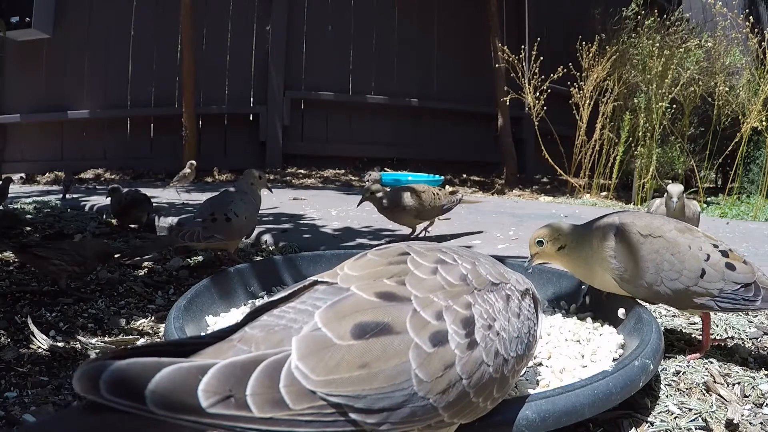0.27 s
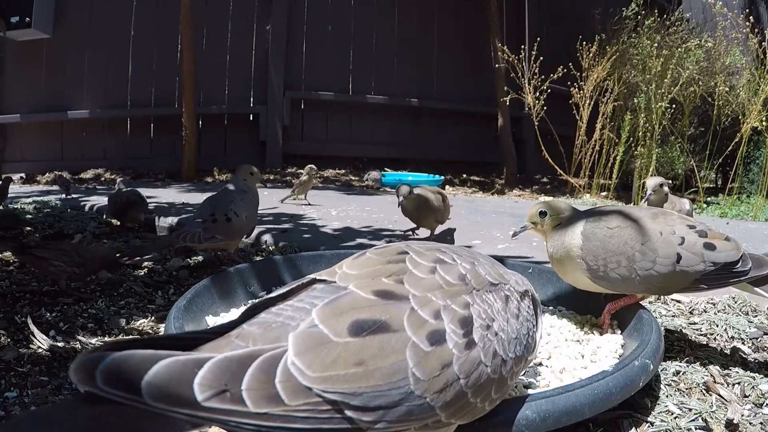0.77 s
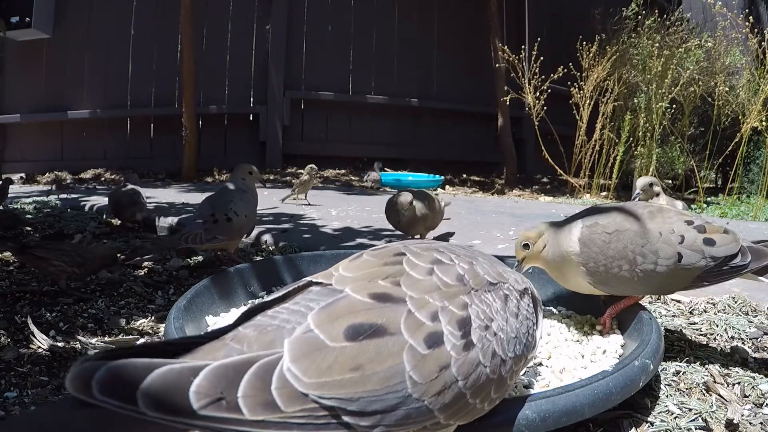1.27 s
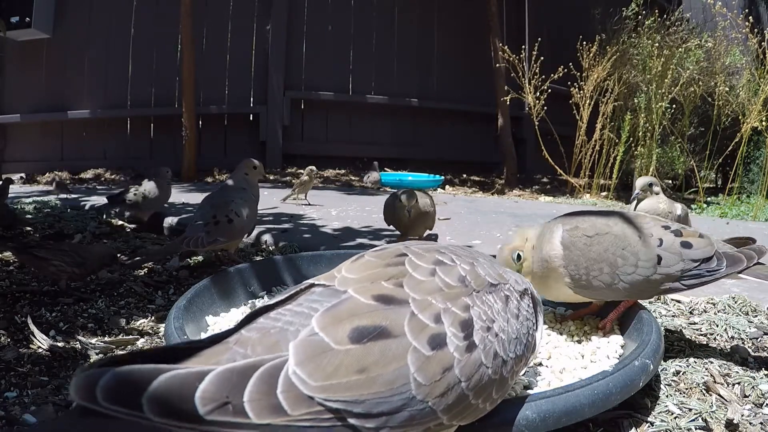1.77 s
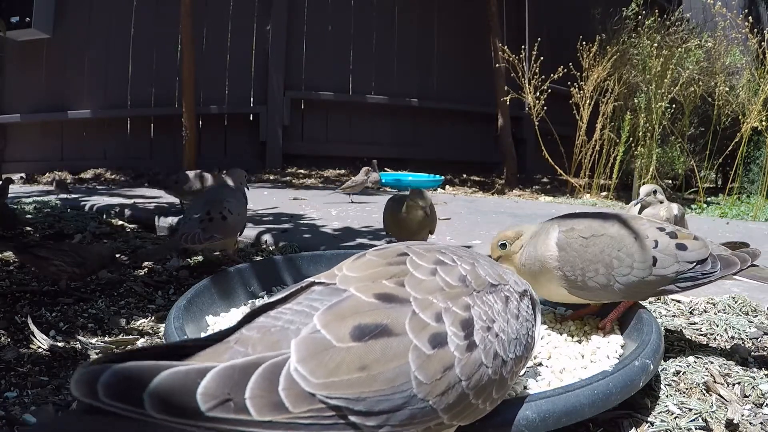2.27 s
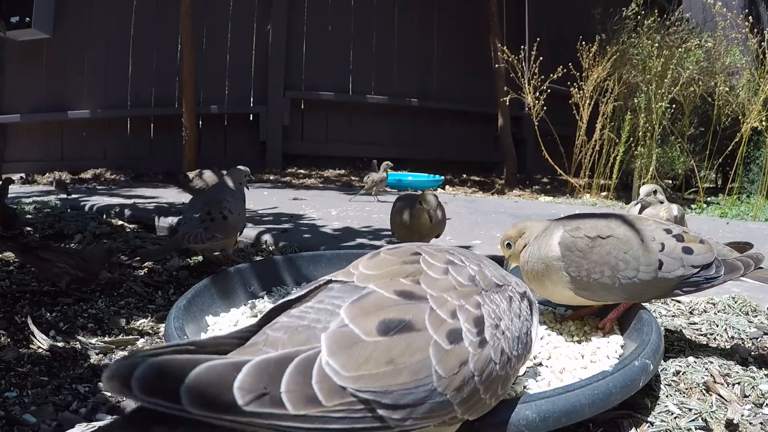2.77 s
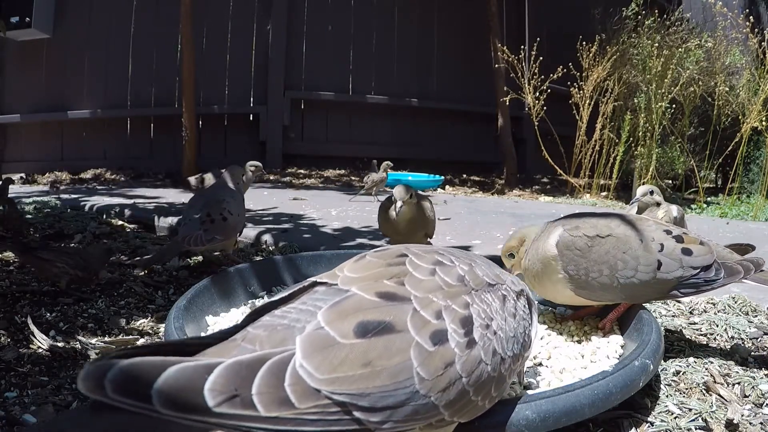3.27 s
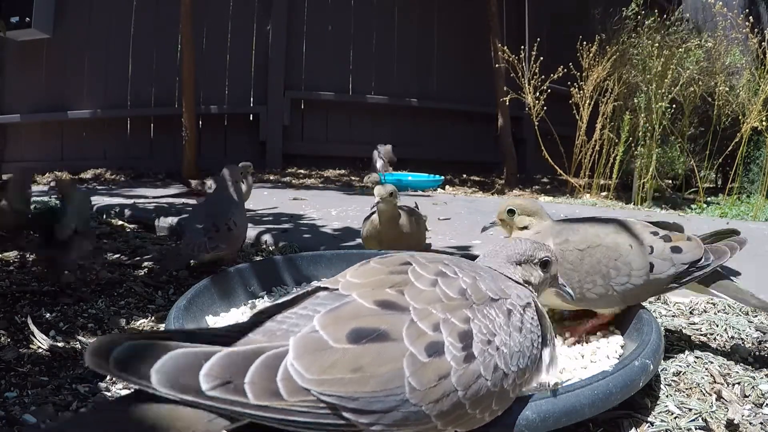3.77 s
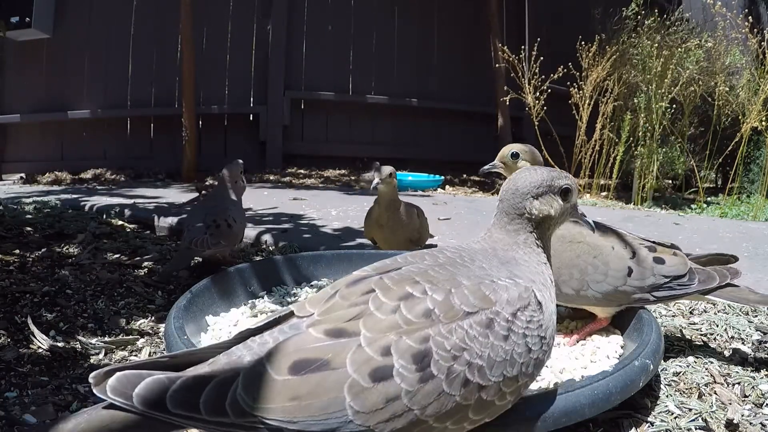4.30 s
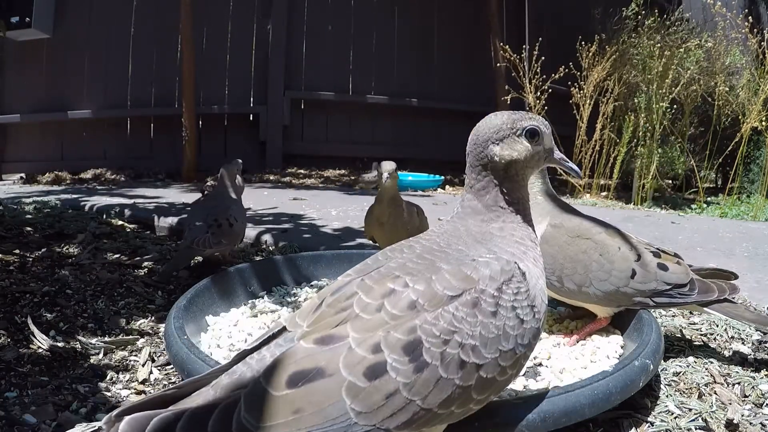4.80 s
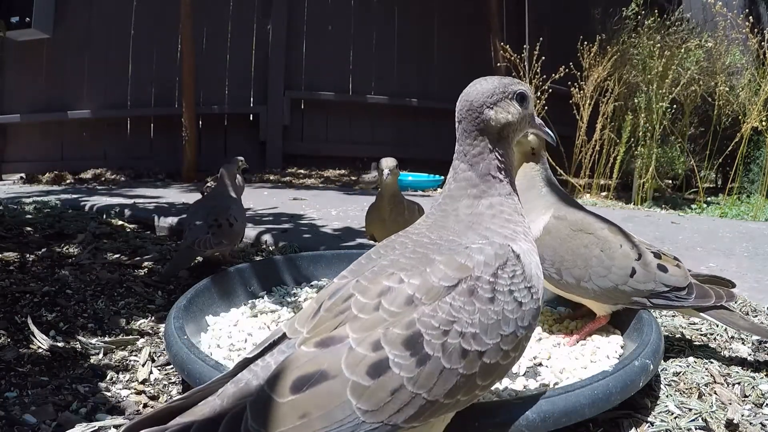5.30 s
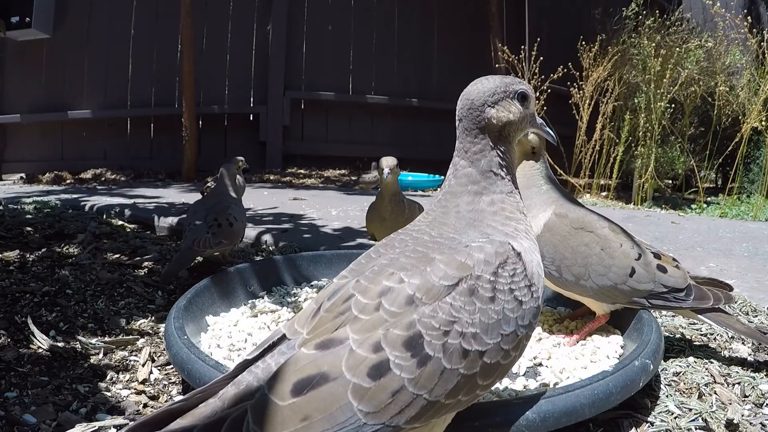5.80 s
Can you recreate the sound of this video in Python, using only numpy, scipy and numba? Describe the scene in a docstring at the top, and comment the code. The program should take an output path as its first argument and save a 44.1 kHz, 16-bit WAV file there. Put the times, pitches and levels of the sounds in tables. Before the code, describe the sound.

In a backyard, doves peck seed from a plastic dish right by the microphone, making sharp, scattered clicks and crackles. Tail feathers tap and scrape the microphone's housing with a hollow sound. Then one dove takes off in a loud burst of cracks, scattered seed and rustling wings, and the pecking thins out. A distant small bird repeats a high buzz over a low town rumble.

```python
"""A distant bird's buzz, then sharp clicks up close: doves peck seed from a plastic dish in a backyard.
Beaks and seeds crack and knock the dish; tail feathers tap and scrape a small camera's housing and ring
its modes. One dove takes off in a rustle of feathers and seed. The small bird's buzz is a fast pitch
warble. Town rumble, a thin whine and wind at the two microphone ports lie underneath, and the gain
control ducks after the loudest scrape."""
import sys
import numpy as np
from scipy import signal
from scipy.fft import rfft, irfft
from scipy.io import wavfile
from scipy.ndimage import uniform_filter1d
from numba import njit

SR = 44100
rng = np.random.default_rng(int(sys.argv[2]) if len(sys.argv) > 2 else 0)


def put_to_file(sound):
    """Save the sound as 16-bit audio at rate SR, in the file named by the first command-line argument."""
    columns = np.atleast_2d(sound).T  # one column per channel
    safe = np.clip(columns, -1, 1)
    whole_steps = np.round(safe * 32767)
    wavfile.write(sys.argv[1], SR, whole_steps.astype(np.int16))


N = 266760

# Port resonances: f/Hz, base width/Hz, gain/dB
PORT_MODES = [(4800, 1500, -10), (7000, 1400, 0), (9300, 2200, -7), (12500, 2500, -14)]
# Dish resonances: f/Hz, width/Hz, gain/dB
DISH_MODES = [(1640, 670, 29), (2250, 520, -16), (3190, 450, 28)]
# Beak and seed hits: t/s, level/dB, dish knock/dB re crack, seed scatter/dB re crack
PECKS = [(0.193, -19.5, -13, -17), (0.2036, -22, -8, -13), (0.215, -24.5, -14, -16), (0.22, -27, -12, -14),
         (0.2256, -21, -8.5, -10), (0.2315, -29, -14, -12), (0.238, -23, -8, -11),
         (0.2506, -14, -14.5, -15), (0.3018, -29, -14, -15), (0.4427, -25.5, -17, -20),
         (0.5365, -36, -10, -15), (0.5678, -23, -19, -15), (0.575, -27, -21, -18), (1.1368, -33, -15, -18),
         (1.191, -30, -12, -15), (1.1945, -25, -10, -15), (1.342, -25.5, -9, -26), (1.348, -26, -9, -20),
         (1.4438, -30, -16, -14), (1.9438, -32, -13, -15), (2.0106, -33.5, -22, -18), (2.98, -37, -10, -15),
         (3.151, -26.5, -23, -16), (3.612, -25.5, -8, -12), (3.6387, -19.5, -9, -10),
         (3.6582, -27, -2, -12), (3.6704, -26, -3, -12), (3.6847, -21, -2, -8), (3.7001, -5, -8.5, -14),
         (3.7301, -6, -10.5, -10), (3.771, -12.5, -9, -14), (3.8082, -20.5, -11, -5), (3.897, -26, -9, -10),
         (3.9863, -17, -10, -10), (4.0032, -28, -9, -11), (4.0174, -23, -13, -11), (4.037, -22.5, -18, -9),
         (4.1022, -31, 1, -15), (4.2017, -21, -8.5, -15), (4.2306, -22.5, -7, -7), (4.346, -33, -6, -15),
         (4.3675, -30.5, -6, -8), (4.7142, -29.5, -2.5, -10), (4.7236, -24.5, -18, -14),
         (4.728, -26.5, -20, -10), (5.025, -37, -13, -11)]

def pecks(rise_s=.0003, decay_s=.0006, scatter_s=.0059, blow_s=.0014, pan_spread_db=2):
    """Each hit cracks into the port resonances, knocks the dish and trails a faint scatter of seed."""
    out, t = np.zeros((2, N)), np.arange(2200) / SR
    for s, db, knock_db, scatter_db in PECKS + stray_seeds():
        pan_db = pan_spread_db * rng.standard_normal()
        decay = np.exp(-t / decay_s) + undb(scatter_db) * np.exp(-t / scatter_s)
        crack = rng.standard_normal((2, len(t))) * (1 - np.exp(-t / rise_s)) * decay
        shades_db = 2 * rng.standard_normal(len(PORT_MODES))
        bright = sum(undb(mode_db + shade_db) * ring(ring(crack, hz, 8.8 * width), hz, 1.22 * width)
                     for (hz, width, mode_db), shade_db in zip(PORT_MODES, shades_db))
        blow = rng.standard_normal((2, len(t))) * np.exp(-t / blow_s)
        blow = blow + .47 * blow[::-1]  # crossfeed
        knock = sum(undb(mode_db) * ring(blow, hz, width) for hz, width, mode_db in DISH_MODES)
        click = .5 * (bright / peak(bright[0]) + undb(knock_db) * knock / peak(knock[0]))
        add(out, s, click * undb(db + np.array([[pan_db], [-pan_db]]) / 2))
    return out


def stray_seeds(gap_s=.025, boost_db=1.5, spread_db=3, knock_db=-2.5, scatter_db=-15):
    """Loose seeds tick at chance times, following the rustle level; rows as in PECKS."""
    times = np.arange(0, N / SR - .1, gap_s)
    times += gap_s * rng.random(len(times))
    rustle_db = 20 * np.log10(seed_motion()[(times * SR).astype(int)])
    levels_db = rustle_db + boost_db + spread_db * rng.standard_normal(len(times))
    return [(s, db, knock_db, scatter_db) for s, db in zip(times, levels_db)]


# Housing resonances: f/Hz, base width/Hz, side/dB, mid/dB
HOUSING_MODES = [(177, 75, -19, -38), (559, 270, -11, -17), (862, 270, -2, -11), (1212, 154, 4, -4.5),
                 (1380, 165, -9, -4.5), (1726, 175, -12, -7.5), (2360, 165, -9, -6), (3344, 320, -36, -14)]

def feather_touch(s, db, rise_ms, fall_ms, scratch_db, tilt_db_oct, side_db=10):
    """Slipping barbs ring the housing and scratch through the air; returns start time and sound."""
    lead_s = .015
    t = np.arange(1800) / SR - lead_s
    envelope = .5 ** np.where(t < 0, (1000 * t / rise_ms) ** 2, (1000 * abs(t) / fall_ms) ** 1.5)
    slips = grains(1.04, size=(4, len(t))) * envelope
    push = slips[:2] + .39 * slips[0]
    detunes = 1 + .015 * rng.standard_normal(len(HOUSING_MODES))  # feather pressure shifts the modes
    spots_db = 1.6 * rng.standard_normal(len(HOUSING_MODES))  # each spot favours other modes
    modes = np.zeros_like(push)
    for (hz, width, mode_side_db, mode_mid_db), detune, spot_db in zip(HOUSING_MODES, detunes, spots_db):
        tilt_db = tilt_db_oct * np.log2(max(hz / 1300, 1))
        gain = undb(tilt_db) * undb([[mode_side_db + spot_db / 2], [mode_mid_db + spot_db]])
        band = detune * hz, 1.25 * width
        modes += gain * ring(ring(push, *band), *band)
    side, mid = modes
    # The touch sounds very wide, mostly opposite in phase between left and right.
    body = stereo(mid / peak(mid), undb(side_db) * side / peak(side))
    scratch = sum(undb(mode_db) * ring(ring(slips[2:], hz, 7.8 * width), hz, 7.8 * width)
                  for hz, width, mode_db in PORT_MODES)
    scratch = np.sqrt(2) * scratch / peak(scratch[0])
    return s - lead_s, undb(db) * (body + undb(scratch_db) * scratch)


# Feather taps: t/s, mid level/dB, scratch/dB re level, fall/ms, upper-mode tilt/(dB/oct)
FEATHER_TAPS = [(0.8427, -32.5, -11, 1.6, -7.5), (1.105, -27, -30, 1.25, -5),
                (1.115, -30.5, -22.5, 3.7, -3), (1.163, -28.5, -18, 2, -2), (1.284, -33.5, -10, 1.5, 1),
                (2.0398, -26.5, -32, 0.8, -4), (2.0826, -47, -20, 2.4, -6), (2.1097, -29, -15.5, 0.64, -2),
                (2.136, -32, -25, 1.8, -6), (2.2392, -28.5, -16, 1.3, -5), (2.359, -28.5, -14.5, 1.04, 0.5),
                (2.377, -35.5, -24, 2.7, 0), (2.399, -29, -21, 2.47, 0), (2.414, -27.5, -10, 3, 4),
                (2.4242, -27, -15, 2.4, 1), (2.5475, -24, -10, 3.18, -1), (2.561, -44, -3, 1.9, 0),
                (2.7886, -37, -30, 5.3, -3.5)]

def feather_taps():
    """Tail feathers strike the housing in single touches."""
    out = np.zeros((2, N))
    for s, db, scratch_db, fall_ms, tilt_db_oct in FEATHER_TAPS:
        rise_ms = .45 * fall_ms
        add(out, *feather_touch(s + rise_ms / 1000, db, rise_ms, fall_ms, scratch_db, tilt_db_oct))
    return out


# Breakpoints per scrape: t/s, mid level/dB, scratch/dB re level, upper-mode tilt/(dB/oct)
FEATHER_SCRAPES = [
    [(1.179, -30.5, -12, 0), (1.185, -25, -25, -7), (1.192, -37, -22, -5), (1.202, -40, -19, -7)],
    [(1.209, -25, -10.5, 1), (1.217, -24, -14, -5), (1.226, -44, -31, -6)],
    [(2.149, -28, -9, 1), (2.16, -31, -14, 1), (2.175, -26.5, -8, -1), (2.198, -31, -17, 2.5),
     (2.208, -44, -20, -5)],
    [(2.246, -50, -16, -3), (2.25, -40, -15, -3), (2.256, -36.5, -30, -5), (2.276, -47, -14, -3),
     (2.28, -58, -10, -3)],
    [(2.405, -35, -13, 1), (2.43, -31, -12, 2), (2.437, -26, -11, 2), (2.443, -29, -12, 3),
     (2.448, -20.5, -11.5, 6), (2.462, -19, -11.5, 7), (2.483, -23, 2.5, 0), (2.501, -38, -9, 2)],
    [(2.503, -33.5, -4, 3), (2.516, -24.5, -3, 2), (2.524, -25.5, -15, 1), (2.53, -17.5, -3.5, 4),
     (2.537, -18.5, 4.5, 4), (2.544, -37, -22, -2)],
]

def feather_scrapes(gap_s=.005, rise_ms=1.48, fall_ms=3.5, spread_db=3):
    """Feathers drag along the housing, their barbs catching in quick uneven succession."""
    out = np.zeros((2, N))
    for scrape in FEATHER_SCRAPES:
        times, *columns = np.transpose(scrape)
        delays_s = .5 * gap_s * rng.random(40)
        offsets_db = spread_db * rng.uniform(-1, 1, 40)
        for k, s in enumerate(np.arange(times[0], times[-1], gap_s)):
            s += delays_s[k]
            db, scratch_db, tilt_db_oct = (np.interp(s, times, column) for column in columns)
            add(out, *feather_touch(s, db + offsets_db[k], rise_ms, fall_ms, scratch_db, tilt_db_oct))
    return out


# Short damped tones, low thumps among them: t/s, f/Hz, mid/dB, side/dB
SHORT_TONES = [(2.484, 209, -17, -21), (2.53, 158, -10, -9), (3.655, 1750, -24, -41), (3.685, 540, -16.5, -30),
               (3.788, 1400, -29, -26), (3.843, 2220, -43, -35), (4.327, 2340, -39, -32),
               (4.553, 1750, -39, -43), (4.626, 1710, -40.5, -38)]

def short_tones(base_t60_s=.027, extra_cycles=6.6):
    """Damped tones with a soft start and slightly rough pitch; lower ones ring longer."""
    out, t = np.zeros((2, N)), np.arange(6000) / SR
    for s, hz, mid_db, side_db in SHORT_TONES:
        t60_s = base_t60_s + extra_cycles / hz
        jitter_rad = hz / 2000 * walk(350)[:len(t)]
        onset = 1 - np.exp(-(2 * hz * t) ** 2)
        tone = np.sin(2 * np.pi * hz * t + jitter_rad) * onset * 1000 ** (-t / t60_s)
        add(out, s, stereo(undb(mid_db) * tone, -undb(side_db) * tone))
    return out


# Take-off envelope: t/s, rustle/dB, wing rumble/dB
TAKE_OFF_LEVELS = [(3.602, -51, -43), (3.612, -37.5, -38.5), (3.65, -38, -35), (3.69, -33.5, -31),
                   (3.715, -36.5, -33), (3.735, -30, -36), (3.77, -34.5, -36), (3.8, -39.5, -35),
                   (3.82, -36.5, -34.5), (3.86, -39, -35), (3.96, -44, -43.5), (4.02, -44, -40),
                   (4.07, -46.5, -41), (4.2, -48.5, -45.5), (4.45, -52, -47.5), (4.7, -53.5, -49.5),
                   (4.9, -85, -73)]

def wing_beats():
    """Beating wings push a low rumble into both ports."""
    mid, side = (level(ring(ring(rng.standard_normal(N), 113, 220), 114, 284), 0) for _ in range(2))
    return undb(curve(TAKE_OFF_LEVELS, column=2)) * stereo(mid, .17 * side)


# Brief rustles of shifting seed: t/s, level/dB, t60/s
SEED_SHIFTS = [(0.128, -44, .15), (0.2, -37.5, 0.31), (.52, -44.5, .24), (1.35, -44.5, 0.26),
               (1.429, -44, 0.43), (1.56, -45.5, 0.21), (4.085, -42, 0.36), (4.232, -45.5, 0.33),
               (4.362, -44.5, 0.24), (4.714, -43.5, 0.37)]

def seed_motion(rise_s=.0027):
    """Rustle amplitude: the take-off plus brief shifts of seed."""
    gain, t = undb(curve(TAKE_OFF_LEVELS, column=1)), np.arange(SR // 2) / SR
    for s, db, t60_s in SEED_SHIFTS:
        add(gain, s, undb(db) * (1 - np.exp(-t / rise_s)) * 1000 ** (-t / t60_s))
    return gain


# Seed and feather spectrum: f/Hz, relative density/dB
RUSTLE_SPECTRUM = [(350, -6.5), (600, -13), (1200, -4.5), (1600, 1.5), (2400, -0.5), (4700, -3),
                   (7000, -1.5), (9000, -1.5), (13500, -14), (15000, -22), (16000, -50)]

def rustle():
    """Seed and feathers rub in patches of dense grains, drawn separately for each port."""
    patches = undb(1.3 * walk(120) + .6 * walk(25))
    swish = [coloured(RUSTLE_SPECTRUM, grains(2.8, size=N) * patches) for _ in range(2)]
    return seed_motion() * np.array(swish)


# Small bird's notes: t/s, length/s, level/dB, top f/Hz
BIRD_NOTES = [(0, 0.23, -45.5, 7860), (0.716, 0.22, -43, 7810), (2.083, 0.215, -40.5, 7900),
              (2.769, 0.25, -40.5, 7690), (3.162, 0.08, -50, 7700), (3.25, 0.084, -55, 7340)]

def small_bird(warble_hz=244, depth_scale_hz=1660, echo_decay_s=.0095):
    """A fast uneven warble dips from an arched top pitch; fence echoes smear it."""
    song = np.zeros(N)
    for s, length_s, db, top_hz in BIRD_NOTES:
        t = np.arange(int(length_s * SR)) / SR
        arch = np.sin(np.pi * (t / length_s) ** .5)
        cycles = np.cumsum(warble_hz * (1 + .3 * walk(300)[:len(t)])) / SR
        dip = (.5 - .5 * np.cos(2 * np.pi * cycles)) ** 1.8
        edge_hz = top_hz - 300 * (1 - arch) - 300 * t / length_s
        depth_hz = depth_scale_hz * (.45 + .42 * arch + .1 * walk(200)[:len(t)])
        envelope = undb(db - 2.8 * dip + 1.5 * walk(350)[:len(t)]) * arch ** 1.1
        add(song, s, envelope * np.sin(2 * np.pi * np.cumsum(edge_hz - depth_hz * dip) / SR))
    t = np.arange(SR // 4) / SR
    fences = rng.standard_normal((2, len(t))) * np.exp(-t / echo_decay_s)
    fences /= np.sqrt((fences ** 2).sum(axis=1, keepdims=True))
    return np.array([signal.fftconvolve(song, echo)[:N] for echo in fences])


# Town spectra, mid and side: f/Hz, relative density/dB
TOWN_MID_SPECTRUM = [(90, -38), (115, -17.5), (160, 0), (250, -5.5), (310, -2), (339, -3), (368, -10.5),
                     (460, -10), (1020, -20.5), (2300, -25.5), (4800, -28), (7500, -27), (12100, -31),
                     (14300, -39), (15300, -62), (16000, -85)]
TOWN_SIDE_SPECTRUM = [(53, -54), (90, -24), (125, -6.5), (172, -0.5), (737, -3.5), (3150, -21.5),
                      (4000, -28), (6160, -21.5), (8350, -19), (13500, -29), (14500, -38), (15300, -62),
                      (16000, -85)]

def town(mid_db=-47, side_db=-47.5):
    """Town rumble and hiss, swelling slightly."""
    swell = undb(.4 * walk(2.86))
    mid = level(coloured(TOWN_MID_SPECTRUM, rng.standard_normal(N)), mid_db)
    side = level(coloured(TOWN_SIDE_SPECTRUM, rng.standard_normal(N)), side_db)
    return swell * stereo(mid, side)


# Whine partials: f/Hz, mid rms/dB
WHINE_PARTIALS = [(4000, -70.5), (4075, -63.5), (4135, -67.5), (4195, -70)]

def whine():
    """Thin, closely spaced tones to the left, wavering in level and phase."""
    t = np.arange(N) / SR
    tones = sum(np.sqrt(2) * undb(db + 1.8 * walk(40)) * np.sin(2 * np.pi * (hz * t + .09 * walk(30)))
                for hz, db in WHINE_PARTIALS)
    return stereo(tones, .5 * tones)


# Wind envelope: t/s, rumble/dB, flutter/dB
WIND_LEVELS = [(0.0, -69, -73), (1.45, -77, -80), (1.77, -87, -89), (2.41, -66, -69), (2.71, -46, -69),
               (2.75, -45, -66), (2.88, -64, -60), (3.17, -54, -68), (3.22, -64, -63), (3.5, -66, -69),
               (3.64, -39, -42), (3.79, -47, -51), (4.23, -56, -53), (4.24, -58, -59), (5.79, -73, -74),
               (6.05, -78, -74)]
# Rumble and flutter spectra: f/Hz, relative density/dB
WIND_SPECTRA = [
    [(10, -3), (30, 0), (45, -3), (62, -30)],
    [(40, -25), (52, 0), (70, -1), (95, -8), (125, -50)],
]

def wind():
    """Air moving over the ports rumbles and flutters, mostly alike at both."""
    out = np.zeros((2, N))
    for column, spectrum in enumerate(WIND_SPECTRA, start=1):
        mid, side = (coloured(spectrum, rng.standard_normal(N)) for _ in range(2))
        out += undb(curve(WIND_LEVELS, column)) * stereo(mid, .22 * side)
    return out


def undb(db):
    return 10 ** (np.asarray(db) / 20)


def level(x, rms_db):
    return x * undb(rms_db) / np.sqrt(np.mean(x ** 2))


def peak(x):
    """Highest short-time rms."""
    return np.sqrt(uniform_filter1d(x ** 2, size=100).max())


def stereo(mid, side):
    return np.array([mid + side, mid - side])


def add(out, s, x):
    """Mix x into out from time s."""
    start = max(int(s * SR), 0)
    n = min(x.shape[-1], N - start)
    out[..., start:start + n] += x[..., :n]


def curve(table, column):
    """A dB column interpolated per sample; -120 dB outside its times."""
    rows = np.array(table)
    return np.interp(np.arange(N) / SR, rows[:, 0], rows[:, column], -120, -120)


def coloured(spectrum, x):
    """Filter x by (f/Hz, gain/dB) rows; rms 1."""
    hz, db = np.transpose(spectrum)
    log_hz = np.log(np.arange(N // 2 + 1) * SR / N + 1)
    gain = undb(np.interp(log_hz, np.log(hz), db))
    return level(irfft(rfft(x) * gain, N), 0)


def ring(x, hz, width_hz):
    """Resonance with unit gain at its centre."""
    return signal.lfilter(*signal.iirpeak(hz, hz / width_hz, SR), x)


def walk(rate_hz):
    """Random steps, smoothed twice; spread of order 1."""
    hold = int(SR / rate_hz)
    steps = rng.standard_normal(N // 100)[np.arange(N) // hold]
    return 2.1 * uniform_filter1d(uniform_filter1d(steps, hold), hold)


def grains(spread_db, size):
    """Noise with a random, capped boost on each sample."""
    return rng.standard_normal(size) * undb(spread_db * np.minimum(rng.exponential(size=size), 5))


@njit
def follow(x, attack, release):
    """Envelope follower; coefficients per sample."""
    envelope, out = 0., np.empty(len(x))
    for i in range(len(x)):
        envelope += (x[i] - envelope) * (attack if x[i] > envelope else release)
        out[i] = envelope
    return out


def scene():
    """Close dove sounds, low-cut, over the backyard."""
    low_cut = signal.butter(6, 125, "high", fs=SR, output="sos")
    doves = feather_taps() + feather_scrapes() + pecks() + short_tones() + rustle() + wing_beats()
    return signal.sosfilt(low_cut, doves) + small_bird() + town() + whine() + wind()


def record(dry, threshold_db=-22, ratio=3.2, attack_s=.13, release_s=.71, cutoff_hz=16300):
    """The right port hears more treble, both lose the very top; gain control ducks loud passages."""
    heard = dry + np.array([[-.15], [.15]]) * ring(dry, 9300, 3600) - .5 * ring(dry, 13500, 8900)
    heard = signal.sosfilt(signal.butter(4, 14600, fs=SR, output="sos"), heard)
    envelope = follow(np.abs(heard).max(axis=0), 1 / (attack_s * SR), 1 / (release_s * SR))
    gain = np.minimum(undb(threshold_db) / (envelope + 1e-9), 1) ** (1 - 1 / ratio)
    top_cut = signal.ellip(10, .2, 90, cutoff_hz, fs=SR, output="sos")
    return signal.sosfilt(top_cut, heard * gain)


dry = scene()
out = record(dry)
put_to_file(out)
```